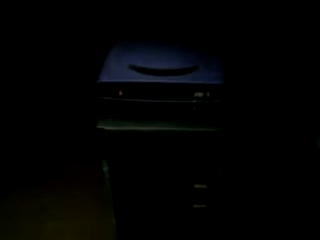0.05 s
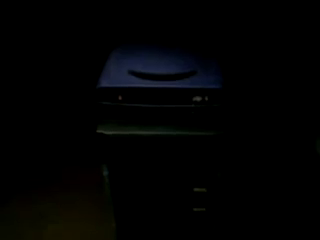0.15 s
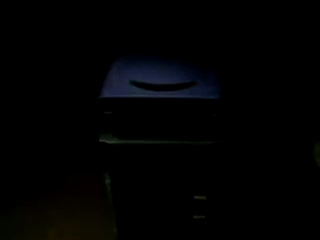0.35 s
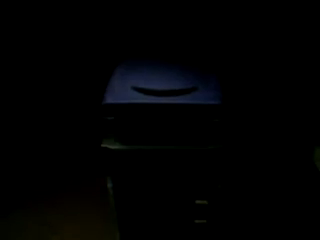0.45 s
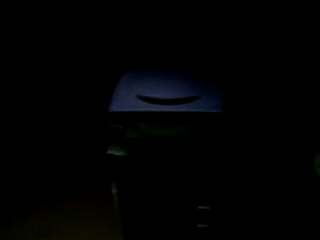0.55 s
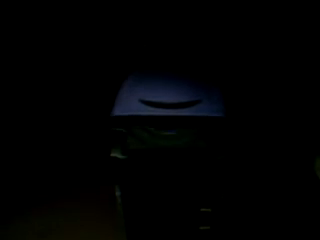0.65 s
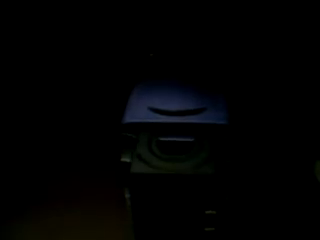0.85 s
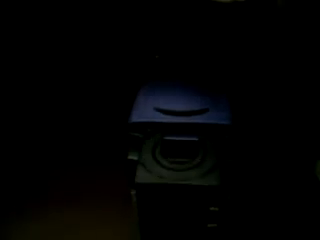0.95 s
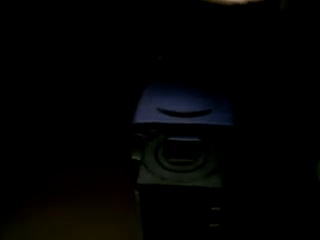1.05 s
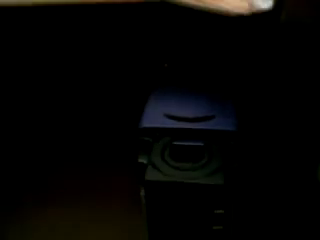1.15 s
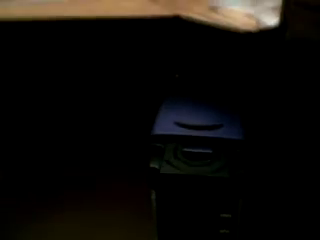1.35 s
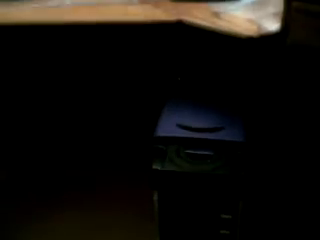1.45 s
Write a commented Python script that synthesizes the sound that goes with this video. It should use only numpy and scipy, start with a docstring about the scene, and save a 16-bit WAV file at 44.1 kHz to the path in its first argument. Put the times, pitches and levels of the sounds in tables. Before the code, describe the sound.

A disc drive's plastic tray closes, clattering along its rails from about 0.2 to 0.4 seconds, loudest at 0.3. A lighter clunk comes at 0.5, then gears whir softly. A click with a tiny squeak comes at 0.9, with small clicks just after and near 1.5. A fan hums and hisses throughout with a faint motor whine, slightly muffled in a small room.

```python
"""A disc drive's tray closing.

The plastic tray clatters along its rails and latches, then the mechanism gives a few lighter clunks;
each impact excites the modes of the casing. The cooling fan hums and hisses throughout and a motor
whines faintly, in a small room. A narrow-band microphone with gain control picks it up."""
import sys
import numpy as np
from scipy import signal
from scipy.fft import rfft, irfft, next_fast_len
from scipy.io import wavfile
from scipy.ndimage import map_coordinates

SR = 44100
rng = np.random.default_rng(int(sys.argv[2]) if len(sys.argv) > 2 else 0)


def pcm_store(signal):
    """Save signal as 16-bit PCM."""
    levels = np.round(np.clip(np.atleast_2d(signal), -1, 1) * 32767)
    wavfile.write(sys.argv[1], SR, levels.astype(np.int16).T)


N = 66150

# Spectrum of a plastic contact. Each row: frequency in Hz, relative spectral density in dB.
CONTACT_SPECTRUM = [(30, -29), (100, -16.5), (300, -21.5), (600, -11), (900, -5), (1500, -5.5), (2200, 0.5),
                    (3100, -0.5), (3800, -5), (4500, -13)]
# Low-pass response of the microphone. Each row: frequency in Hz, gain in dB.
MIC_RESPONSE = [(3700, -1), (4050, -6.5), (4300, -12), (4500, -25), (4650, -50), (4800, -110)]


def amp(db):
    """Amplitude ratio for a level in decibels."""
    return 10 ** (np.asarray(db) / 20)


def unit(x):
    """Normalisation to an rms of 1."""
    return x / np.sqrt(np.mean(x ** 2) + 1e-20)


def along(points, hz):
    """Interpolation of (Hz, value) points on a logarithmic frequency axis."""
    freqs, values = np.transpose(points)
    return np.interp(np.log(hz + 1), np.log(freqs + 1), values)


def envelope(points):
    """Amplitude envelope through (seconds, dB) points."""
    return amp(np.interp(np.arange(N) / SR, *np.transpose(points)))


def decay(t, t60):
    """Exponential damping: 60 dB in t60 seconds."""
    return np.exp(-np.log(1000) * t / t60)


def wobble(knots_per_s):
    """Smooth random modulation: a spline through Gaussian values."""
    return map_coordinates(rng.standard_normal(256), [np.arange(N) * knots_per_s / SR], mode="mirror")


def filtered(x, response):
    """Linear filtering: the spectrum is multiplied by a frequency response."""
    size = next_fast_len(N + SR // 2)
    return irfft(rfft(x, size) * response(np.fft.rfftfreq(size, 1 / SR)), size)[:N]


def noise(spectrum):
    """Coloured noise of rms 1 within the microphone's band."""
    white = rng.standard_normal(N)
    return unit(filtered(white, lambda hz: amp(along(spectrum, hz)) * (hz < MIC_RESPONSE[-1][0])))


def tone(hz, flutter_db=4):
    """A sinusoid of rms 1 with random amplitude modulation; its phase is the integral of hz."""
    flutter = amp(flutter_db * wobble(14))
    return unit(flutter * np.sin(2 * np.pi * (np.cumsum(hz) / SR + rng.random())))


def add(track, start_s, sound):
    """Superposition of a sound on the track from start_s onward."""
    i = max(round(start_s * SR), 0)
    track[i:i + len(sound)] += sound[:max(N - i, 0)]


def room(x, tail_db=-6):
    """Reverberation: a diffuse tail of decaying noise follows the direct sound after 5 ms."""
    # Each row: frequency in Hz, reverberation time in seconds.
    reverb_times = [(200, 0.18), (1200, .35), (4000, .28)]
    hz, t, spectra = signal.stft(rng.standard_normal(SR // 2), SR, nperseg=256)
    tail = signal.istft(spectra * decay(t, along(reverb_times, hz)[:, None]), SR, nperseg=256)[1]
    response = np.pad(tail, (SR // 200, 0)) / np.linalg.norm(tail)
    return x + amp(tail_db) * signal.fftconvolve(x, response)[:len(x)]


def fan(blade_hz=175.6, drift=0.0035):
    """Periodic blade passage gives a harmonic series; turbulent air adds broadband noise."""
    # The fundamental, which swells briefly. Each row: time in seconds, level in dB.
    fundamental_levels = [(0, -59), (.7, -57), (1.17, -60.5), (1.235, -46), (1.29, -62.5), (1.5, -53)]
    # The third harmonic, the strongest. Each row: time in seconds, level in dB.
    third_levels = [(0, -40.5), (.27, -42), (.35, -47.5), (.55, -42), (.85, -43.5), (1.2, -48.5),
                    (1.5, -49.5)]
    # The other harmonics. Each row: multiple of the blade rate, level in dB.
    harmonics = [(2, -55), (4, -51.5), (5, -55.5)]
    # Rushing air. Each row: frequency in Hz, relative spectral density in dB.
    air_spectrum = [(25, -13.5), (50, -25.5), (110, -23.5), (180, -13.5), (215, -16), (245, -10),
                    (290, -15), (350, -12.5), (430, -16), (520, -9), (680, -2), (850, -5.5), (1150, -4.5),
                    (1500, -8), (2000, -4.5), (2600, -8), (3150, -11.5), (3600, -15.5), (4400, -23)]
    # Its envelope. Each row: time in seconds, level in dB.
    air_levels = [(0, -34.5), (.2, -34), (.48, -36), (.8, -35), (1.15, -37), (1.5, -37.5)]
    hz = blade_hz * (1 + drift * wobble(18))
    overtones = sum(amp(db) * tone(order * hz) for order, db in harmonics)
    fundamental = envelope(fundamental_levels) * tone(hz)
    third = envelope(third_levels) * tone(3 * hz, flutter_db=0.44)
    return fundamental + third + overtones + envelope(air_levels) * noise(air_spectrum)


def motor(drift=0.0017, gear_hz=2972, width_hz=240):
    """Rotation gives spectral lines that waver together; the gears whir as narrow-band noise."""
    # Each row: frequency in Hz, level in dB.
    motor_lines = [(1287, -55), (1364, -51.5), (1470, -51), (1955, -49), (2116, -63), (2212, -46.5),
                   (3871, -58.5)]
    # Whir of the tray gears. Each row: time in seconds, level in dB.
    gear_levels = [(0, -56.5), (.45, -62), (.56, -41.5), (.8, -39), (.95, -46.5), (1.5, -46)]
    speed = 1 + drift * wobble(9.5)
    whine = sum(amp(db) * tone(hz * speed) for hz, db in motor_lines)
    whir = filtered(rng.standard_normal(N), lambda hz: 1 / (1 + (2 * (hz - gear_hz) / width_hz) ** 2))
    return whine + envelope(gear_levels) * unit(whir)


def tray_slide(contacts_per_s=450):
    """The tray chatters on its rails: a Poisson process of tiny contacts whose energies add."""
    # Each row: time in seconds, level in dB.
    rattle_levels = [(.21, -60), (.235, -31), (.28, -25), (.32, -33), (.39, -18), (.43, -45.5), (.48, -45)]
    t = np.arange(SR // 20) / SR
    hits = (rng.random(N) < contacts_per_s / SR) * rng.exponential(size=N)
    energy = np.abs(signal.fftconvolve(hits, decay(t, t60=0.0093))[:N])
    chatter = unit(np.sqrt(energy) * noise(CONTACT_SPECTRUM))
    return room(envelope(rattle_levels) * chatter)


def squeak(start_s=0.9225, level_db=-25.5, from_hz=2200, to_hz=1087, glide_s=0.0065, roughness=0.075):
    """Friction gives a rough note whose pitch drops quickly as the rubbing part comes to rest."""
    out, t = np.zeros(N), np.arange(SR // 4) / SR
    glide = to_hz + (from_hz - to_hz) * np.exp(-t / glide_s)
    hz = glide * (1 + roughness * wobble(600)[:len(t)])
    add(out, start_s, amp(level_db) * np.sin(2 * np.pi * np.cumsum(hz) / SR) * decay(t, t60=0.22))
    return room(out)


def body_thumps():
    """The drive's body takes the heavier blows with a strongly damped low-frequency response."""
    # Each row: start in seconds, level in dB.
    blows = [(0.23, -38.5), (0.267, -36.5), (.301, -37.5), (0.516, -36)]
    # Each row: frequency in Hz, relative spectral density in dB.
    body_spectrum = [(25, -8.5), (110, -6), (300, -7), (500, 0), (900, -34)]
    out, t = np.zeros(N), np.arange(SR // 4) / SR
    for start_s, db in blows:
        add(out, start_s, amp(db) * noise(body_spectrum)[:len(t)] * decay(t, t60=0.076))
    return out


def peak_crackle():
    """Broadband noise bursts: two thin, bright ticks of clipping-like distortion on the loudest blow."""
    # Each row: start in seconds, level before filtering in dB.
    ticks = [(.3022, -25), (.3075, -29.5)]
    # Each row: frequency in Hz, gain in dB.
    colour = [(1500, -11.5), (4500, 6), (7000, -5), (11000, -11.5), (15500, -10)]
    out, t = np.zeros(N), np.arange(SR // 20) / SR
    for start_s, db in ticks:
        add(out, start_s, amp(db) * rng.standard_normal(len(t)) * decay(t, t60=0.011))
    return filtered(out, lambda hz: amp(along(colour, hz)))


def knocks(attack_s=0.00074, scatter_db=1.5):
    """Impact excitation: each contact cracks, and the struck part and the casing ring in damped modes."""
    # Plastic contacts of tray and latch. Each row: start in seconds, level in dB, pitch of the struck
    # part in Hz, relative level of its ping in dB, relative level of the casing's ring in dB.
    contacts = [(.108, -34, 3180, -2, -12), (.203, -26.5, 2494, 4.5, -5.5), (.228, -15, 2120, 4, -11),
                (0.241, -21, 2564, 6.5, -11.5), (.253, -19.5, 2400, -12.5, 1.5),
                (.257, -19.5, 2430, -7, 2.5), (0.2654, -12.5, 2334, 7, -2), (.271, -13, 2440, 4.5, -1.5),
                (.282, -17, 2500, -7, -4.5), (.2875, -21, 2670, -2.5, -6.5), (0.2994, -9, 2587, -2.5, -13),
                (.3018, -6.5, 2994, -8, -12), (.311, -19.5, 2547, -2, 3), (0.33, -30.5, 2420, -3, 1),
                (0.344, -31, 3260, 7.5, -5.5), (.365, -16.5, 3065, -3.5, -5), (.372, -18.5, 3220, 9, -1.5),
                (.386, -16, 3085, 10, -5), (.389, -20.5, 3274, 7, -12), (0.5184, -20, 2316, 1.5, -7),
                (0.5278, -25.5, 2374, 8.5, -11), (.921, -18.5, 2465, -1.5, -10),
                (.9235, -22.5, 1967, 5, -6), (.943, -26.5, 2570, -5.5, -24.5), (.974, -28, 2300, -17, -6.5),
                (1.024, -24, 2715, -9.5, -2.5), (1.037, -26, 2346, 1, -7), (1.056, -34, 3380, 1, -15),
                (1.463, -29, 3470, -4, -9), (1.47, -27.5, 3320, 6, -12)]
    # Each row: frequency in Hz, relative level in dB, time to decay by 60 dB in seconds.
    casing_modes = [(900, -14.5, .07), (1280, -15.5, 0.3), (1775, -13.5, 0.18), (1820, -18.5, 0.061),
                    (2054, -8.5, 0.12), (2361, -4, 0.24), (2605, -10.5, 0.14), (2685, -12.5, 0.36),
                    (2770, -10, 0.14), (2964, -11, 0.26), (3070, -24, 0.18), (3140, -18, .22),
                    (3434, -16.5, 0.24)]
    out, t = np.zeros(N), np.arange(SR // 2) / SR
    mode_hz, mode_db, mode_t60 = np.transpose(casing_modes)[:, :, None]
    rise = 1 - np.exp(-t / attack_s)
    for start_s, db, ping_hz, ping_db, ring_db in contacts:
        crack = noise(CONTACT_SPECTRUM)[:len(t)] * decay(t, t60=0.04)
        ping = amp(ping_db) * np.sin(2 * np.pi * ping_hz * t) * decay(t, t60=0.032)
        amplitudes = amp(ring_db + mode_db + scatter_db * rng.standard_normal(mode_hz.shape))
        phases = 2 * np.pi * (mode_hz * t + rng.random(mode_hz.shape))
        ring = (amplitudes * np.sin(phases) * decay(t, mode_t60)).sum(0)
        add(out, start_s, amp(db) * (room(rise * (crack + ping)) + rise * ring))
    return out


def scene():
    """Superposition at one microphone; only the peak crackle lies above the low-pass response."""
    sources = knocks() + body_thumps() + squeak() + tray_slide() + fan() + motor()
    muffled = filtered(sources, lambda hz: amp(along(MIC_RESPONSE, hz)))
    return (muffled + peak_crackle())[None]


def record(dry, knee_db=-23.5, slope=0.29, averaging_s=0.12, top_hz=15850):
    """Automatic gain control: gain falls as the running mean power rises. A band limit follows."""
    pole = np.exp(-1 / (averaging_s * SR))
    power = signal.lfilter([1 - pole], [1, -pole], dry[0] ** 2)
    gain = (1 + power / amp(knee_db) ** 2) ** -slope
    return filtered(gain * dry[0], lambda hz: hz < top_hz)[None]


dry = scene()
out = record(dry)
pcm_store(out)
```